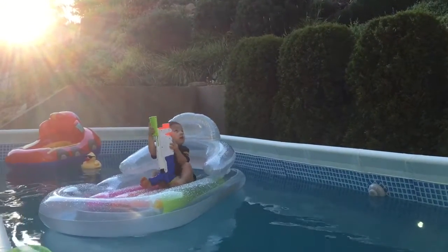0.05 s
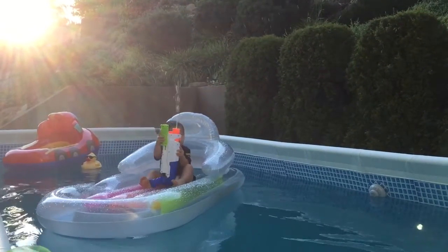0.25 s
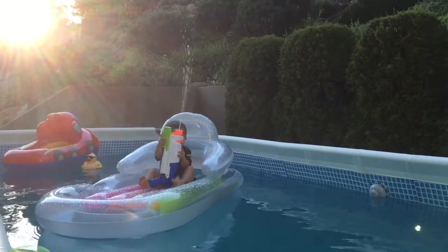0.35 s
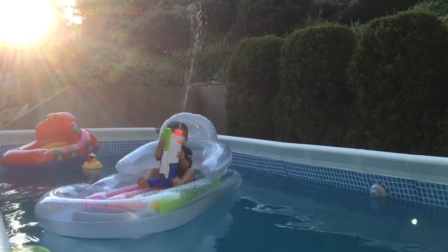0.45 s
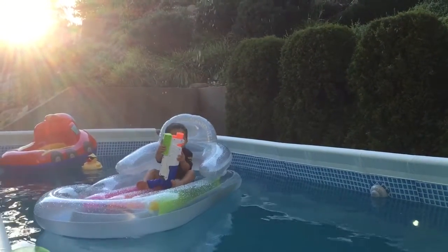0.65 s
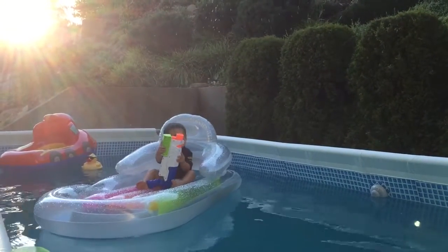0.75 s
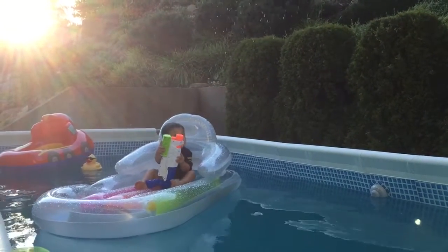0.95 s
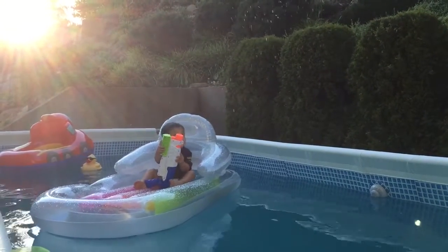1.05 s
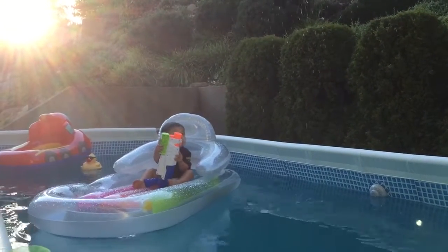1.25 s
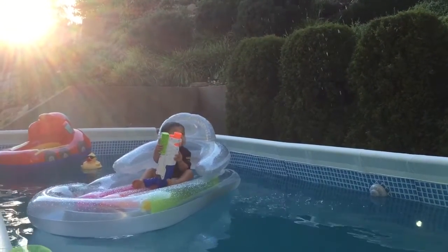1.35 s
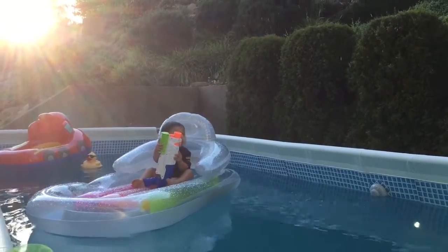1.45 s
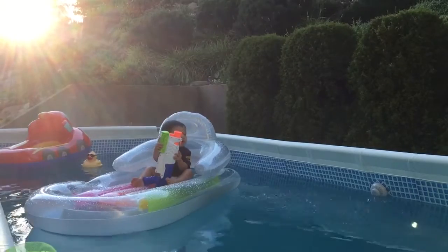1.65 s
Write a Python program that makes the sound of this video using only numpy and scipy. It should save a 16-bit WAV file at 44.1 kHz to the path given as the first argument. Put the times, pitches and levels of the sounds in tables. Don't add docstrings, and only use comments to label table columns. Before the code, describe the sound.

Short sputtering squirt from a plastic water gun, then near silence over faint pump hum and far traffic, then a dull splash on inflated vinyl and small drips in the pool, heard outdoors from a few metres.

```python
import sys
import numpy as np
from scipy import signal
from scipy.fft import rfft, irfft
from scipy.io import wavfile
from scipy.ndimage import uniform_filter1d

SR = 44100
rng = np.random.default_rng(int(sys.argv[2]) if len(sys.argv) > 2 else 0)


def magnitude_from_level(level_db):
    exponent = np.asarray(level_db, float) / 20
    return 10 ** exponent


def wav_record(signal):
    frames = np.transpose(np.atleast_2d(signal))
    bounded = np.clip(frames, -1, 1)
    quanta = np.round(bounded * 32767).astype(np.int16)
    wavfile.write(sys.argv[1], SR, quanta)


N = 74970
T = np.arange(N) / SR

# f/Hz, density/dB
GARDEN_SPECTRUM = [(18, -89), (30, -23), (55, -0.5), (151, -2.5), (201, -9), (314, -7.5), (441, -21),
                   (476, -17), (15300, -44)]
# f/Hz, width/Hz, level/dB
PUMP_HUM = [
    (146, 16, -64.5),
    (104.4, 56, -66),
    (304.2, 11.4, -74.5),
]
# t/s, level/dB, f/Hz, length/s
GURGLES = [(.172, -59.5, 1770, 0.015), (.265, -50.5, 1295, 0.0072), (.292, -52, 1500, 0.011),
           (.271, -54, 1970, 0.013), (.28, -63, 803, 0.02), (.55, -62.5, 751, 0.038),
           (.612, -58, 950, 0.035), (.62, -50.5, 261.7, 0.03), (.668, -47.5, 310, 0.021),
           (.668, -58.5, 1500, 0.045), (.135, -56, 253.6, 0.023)]
# t/s, level/dB, hold/s, bubble f/Hz, barrel level/dB
AIR_POCKETS = [(0.2034, -42.5, 0.00061, 10400, -24), (0.211, -63, .001, 12300, -24),
               (0.2214, -39.5, 0.0047, 1902, -8.5), (0.226, -42, 0.0059, 2950, -8),
               (0.291, -43, 0.0036, 5880, -25), (0.297, -44.5, 0.0069, 4000, -4),
               (0.3213, -41, 0.0053, 5560, -27), (0.333, -45.5, 0.0037, 5930, -18),
               (.338, -42.5, 0.0061, 2294, -22), (0.3515, -40, 0.0073, 2170, -4.5),
               (.353, -43.5, 0.0064, 6840, -25), (0.3682, -40, .002, 13500, -12),
               (.369, -45.5, .008, 6680, -26), (.38, -45.5, 0.0045, 2780, -21),
               (0.396, -47, 0.0093, 4030, -26), (0.43, -41, 0.00066, 13200, -14),
               (.44, -44, 0.00039, 10000, -14), (0.4442, -39, .0004, 13000, -12),
               (0.449, -42, 0.00051, 12500, -10), (0.455, -50.5, 0.0066, 4460, -33),
               (.472, -42, .0005, 13000, -14), (0.518, -43, 0.0011, 13000, -16),
               (0.5282, -35, 0.0067, 1923, -5), (.537, -44.5, 0.0054, 4425, -16),
               (0.556, -40, .002, 13000, -17), (0.562, -46.5, 0.0056, 3120, -16),
               (0.573, -44, .002, 14000, -15), (0.5778, -31.5, 0.0067, 3110, 1.5),
               (0.587, -38, 0.0044, 6200, -2), (.603, -46, 0.012, 1950, -17),
               (0.627, -32, .0009, 14200, -21), (0.633, -42.5, .003, 6070, -12),
               (.654, -44.5, 0.0045, 3650, -29), (0.6568, -35.5, 0.0047, 13900, -8),
               (0.6607, -36, 0.0075, 2494, -3.5), (0.666, -41, 0.0059, 3470, -5),
               (0.694, -57.5, .008, 3490, -14)]
BARREL_MODES = [0, 3, -4, -5]
# t/s, level/dB, treble tilt/dB
MAIN_STROKE = [
    (.2, -53.5, 11),
    (.219, -53, 5),
    (.235, -53.5, 0.5),
    (0.286, -50.5, -14),
    (0.289, -45.5, 9),
    (.37, -46, 5),
    (.43, -50.5, 12.5),
    (.52, -53, 3.5),
    (0.527, -45.5, -1),
]
# t/s, level/dB, treble tilt/dB
SPUTTER = [
    (.54, -40, -0.5),
    (.575, -45.5, 4),
    (.595, -47, 15),
    (0.598, -51, -22),
    (.6255, -55, -22),
    (0.63, -44.5, 7),
    (0.678, -47, 2),
    (.7, -53.5, -3),
    (.75, -72, -3),
]
# f/Hz, density/dB
JET_SPECTRUM = [(410, -45), (750, -15), (1150, -23), (1700, -9), (2300, -5), (6120, -7.5), (11000, -8.5),
                (15300, -6)]
# t/s, plink level/dB, f/Hz, tick level/dB
POOL_DROPS = [(1.393, -66, 9600, -50), (1.419, -76, 7950, -58), (1.434, -71, 8600, -60),
              (1.461, -68, 9050, -58), (1.479, -64, 7500, -54), (1.483, -61, 14000, -54),
              (1.4895, -52, 5660, -51.5), (1.4972, -55.5, 4380, -67), (1.506, -57.5, 3000, -64),
              (1.512, -60.5, 2980, -70), (1.519, -62, 8900, -52), (1.525, -63, 8000, -56),
              (1.5305, -72, 7900, -62), (1.528, -64, 5900, -61), (1.545, -58, 5600, -60),
              (1.5665, -56, 4340, -62), (1.572, -70, 13000, -61), (1.606, -54, 5240, -56),
              (1.6199, -46.5, 3160, -49.5), (1.633, -47.5, 1700, -51), (1.638, -81, 11000, -53),
              (1.656, -60, 1700, -70), (1.66, -66, 8700, -60), (1.6642, -44, 2593, -52),
              (1.681, -60, 9000, -66), (1.686, -52.5, 3240, -47.5), (1.694, -62, 13000, -56),
              (1.696, -59, 1750, -70), (1.643, -60, 3300, -78), (.959, -68, 3700, -77)]
# f/Hz, level/dB, t60/s
RAFT_MODES = [
    (96.4, -31, 0.11),
    (340, -54, 0.13),
    (569, -46, 0.055),
    (1500, -58, 0.059),
    (2000, -50, 0.026),
    (3000, -48, 0.013),
]
# f/Hz, density/dB
FOAM_SPECTRUM = [(88, -19), (150, -5), (1210, -18), (1300, -15.5), (2030, -14), (2670, -19.5), (9000, -47),
                 (11700, -54), (19800, -120)]
# t/s, level/dB, f/Hz, length/s
SQUEAKS = [
    (1.425, -67.5, 6440, 0.055),
    (1.43, -70, 5200, 0.03),
]


def unit(x):
    return x / np.sqrt(np.mean(x ** 2))


def band(x, hz, width_hz):
    return signal.lfilter(*signal.iirpeak(min(hz, 16000), hz / width_hz, fs=SR), x)


def colour(x, spectrum):
    hz, db = np.array(spectrum).T
    grid_hz = np.linspace(1, SR / 2, 4097)
    log_gain = np.interp(np.log(grid_hz), np.log(hz), db) * np.log(10) / 20
    cepstrum = irfft(log_gain)
    cepstrum[1:4096] *= 2
    cepstrum[4097:] = 0
    impulse = irfft(np.exp(rfft(cepstrum)))
    return unit(signal.fftconvolve(x, impulse)[:len(x)])


def walk(rate_hz):
    k = int(SR / rate_hz)
    steps = np.repeat(rng.standard_normal(N // k + 1), k)
    return unit(uniform_filter1d(uniform_filter1d(steps, k), k)[:N])


def gritty(db, size=N):
    sizes = magnitude_from_level(db * np.minimum(rng.exponential(size=size), 4))
    return unit(rng.standard_normal(size) * sizes)


def fade(t, t60):
    return (t >= 0) * magnitude_from_level(-60 * np.maximum(t, 0) / t60)


def add(out, s, x):
    i = int(s * SR)
    out[i:i + len(x)] += x[:N - i]


def garden():
    patches = 0
    for hz in 40 * 2 ** np.arange(0, 6, 1 / 3):
        patches = patches + magnitude_from_level(2.5 * walk(14)) * band(rng.standard_normal(N), hz, hz / 5)
    highpass = signal.butter(2, 2300, "high", fs=SR, output="sos")
    leaves = signal.sosfilt(highpass, rng.standard_normal(N))
    air = colour(patches + leaves, GARDEN_SPECTRUM) * magnitude_from_level(-57 + walk(5.45))
    hum = 0
    for hz, width_hz, db in PUMP_HUM:
        tone = band(band(rng.standard_normal(N), hz, width_hz), hz, width_hz)
        hum = hum + magnitude_from_level(db + 0.5 * walk(9.2)) * unit(tone)
    return air + hum


def warbles(notes):
    rise, waver, wobble_db = 0.037, 0.0114, 3.5
    out = 0
    for s, db, hz, length in notes:
        u = (T - s) / length
        pitch = hz * (1 + rise * np.clip(u, -1, 1) * (hz < 3000) + waver * walk(200))
        level = magnitude_from_level(db + wobble_db * min(hz / 1000, 1) * walk(200))
        out = out + level * np.exp(-4 * u ** 2) * np.sin(2 * np.pi * np.cumsum(pitch) / SR)
    return out


def barrel(x):
    pipe_hz, width_hz = 3120, 150
    modes = 0
    for k, db in enumerate(BARREL_MODES, 1):
        modes = modes + magnitude_from_level(db) * band(x, pipe_hz * k, width_hz * k)
    return unit(modes)


def bubble_note(hz, t):
    q, steady, sag, sag_s, big_below_hz = 25, 1.4, .7, .0035, 2750
    a, b = rng.standard_normal((2, len(t)))
    shake = signal.lfilter(*signal.butter(1, hz / q / 2, fs=SR), a + 1j * b)
    shake = shake + steady * np.std(shake)
    pitch = hz * (1 + sag * (hz < big_below_hz) * np.exp(-t / sag_s))
    return unit((shake * np.exp(2j * np.pi * np.cumsum(pitch) / SR)).real)


def spits():
    bubble_db, click_db, click_t60_s = -1.5, 7, .006
    out, t = np.zeros(N), T[:4000]
    for s, db, hold, hz, ring_db in AIR_POCKETS:
        tiny = hz > 9000
        onset_s = .003 if s > .655 else .0003
        t60 = (.003 if tiny else .014) + 4.9 * hold
        env = np.minimum(t / onset_s, 1) * fade(np.maximum(t - hold, 0), t60)
        rasp = gritty(1.5, size=4000)
        drive = rasp * (1 + magnitude_from_level(click_db) * fade(t, click_t60_s))
        if tiny:
            drive = unit(np.diff(drive, n=3, prepend=[0, 0, 0]))
        pocket = colour(drive, JET_SPECTRUM) + magnitude_from_level(bubble_db) * bubble_note(hz, t)
        pocket = pocket + magnitude_from_level(ring_db) * barrel(drive)
        add(out, s, magnitude_from_level(db) * env * unit(pocket))
    return out


def fizz(lo_hz, hi_hz):
    per_s, cycles, bands = 800, 25, 14
    out = 0
    for hz in np.geomspace(lo_hz, hi_hz, num=bands):
        hits = rng.random(N) < per_s / bands / SR
        kicks = hits * magnitude_from_level(3.0 * np.minimum(rng.exponential(size=N), 3))
        out = out + unit(band(kicks, hz, hz / cycles)) / np.sqrt(hz)
    return unit(out)


def jet():
    valve_opens_s, fizz_db, barrel_db, flicker_db = .2036, -5, -15.5, 1.2
    s, db, tilt_db = np.vstack([MAIN_STROKE, SPUTTER]).T
    hiss = unit(colour(gritty(2.7), JET_SPECTRUM) + magnitude_from_level(fizz_db) * fizz(1898, 7370))
    hiss = unit(hiss + magnitude_from_level(barrel_db) * barrel(hiss))
    low = signal.sosfiltfilt(signal.butter(4, 6000, fs=SR, output="sos"), hiss)
    high = hiss - low
    tilt = np.interp(T, s, tilt_db)
    low = low * magnitude_from_level(flicker_db * walk(60.2) - tilt / 2)
    high = high * magnitude_from_level(flicker_db * walk(89.9) + tilt / 2)
    level = np.interp(T, s, db, left=-120, right=-120)
    return (low + high) * (T > valve_opens_s) * magnitude_from_level(level + flicker_db * walk(152.4))


def drops():
    cycles, attack_cycles, dip = 46, 5, .06
    out, t = np.zeros(N), T[:3000]
    for s, db, hz, tick_db in POOL_DROPS:
        a, b = rng.standard_normal((2, 3000))
        settling = dip * 3 / hz * np.exp(-t * hz / 3)
        tone = np.sin(2 * np.pi * hz * (t - settling))
        tone = tone * fade(t - attack_cycles / hz / 2, cycles / hz) * np.minimum(t * hz / attack_cycles, 1)
        ring = magnitude_from_level(-9) * unit(band(a, hz, hz / 30)) * fade(t, .06) * np.minimum(t / 0.0023, 1)
        tick = unit(signal.lfilter(*signal.butter(2, 5000, "high", fs=SR), b)) * fade(t, .008)
        smack = magnitude_from_level(1) * a * fade(t, .002)
        add(out, s, magnitude_from_level(db) * (2 * tone + ring) + magnitude_from_level(tick_db) * (tick + smack))
    return out


def mist():
    swell = np.exp(-((T - 1.32) / 0.054) ** 2)
    return magnitude_from_level(-79.5 + 3.7 * walk(100)) * unit(band(gritty(2.4), 13300, 4000)) * swell


def raft(thump_s):
    t = T - thump_s
    push = np.zeros(N)
    add(push, thump_s, gritty(3.2, size=600) * fade(T[:600], 0.016) / 6)
    modes = 0
    for hz, db, t60 in RAFT_MODES[1:]:
        pole = np.exp(2j * np.pi * hz / SR - np.log(1000) / (t60 * SR))
        modes = modes + magnitude_from_level(db) * signal.lfilter([1], [1, -pole], push).imag
    hz, db, t60 = RAFT_MODES[0]
    late = t - 0.0121
    boom = magnitude_from_level(db) * np.sin(2 * np.pi * hz * late) * fade(late, t60) * np.clip(late / 0.0078, 0, 1)
    crack = magnitude_from_level(-56) * gritty(1.7) * fade(t, 0.023)
    return crack + modes + boom


def splash(thump_s):
    splash_db, splash_t60_s, slap_db, slap_t60_s, fizz_db = -46, 0.42, 0, .06, -9
    t = T - thump_s
    foam = colour(gritty(2.85), FOAM_SPECTRUM) + magnitude_from_level(fizz_db) * fizz(690, 3700)
    decay = fade(t, splash_t60_s) + magnitude_from_level(slap_db) * fade(t, slap_t60_s)
    foam = foam * magnitude_from_level(splash_db + 2 * walk(200)) * np.clip(t / 0.0055, 0, 1) * decay
    spray = magnitude_from_level(-72.5 + 3.0 * walk(119.8)) * unit(band(gritty(3.4), 9300, 14000)) * (t > 0)
    return foam + spray


def echo(near):
    t = T[:12000]
    tail = signal.lfilter(*signal.butter(1, 6000, fs=SR), rng.standard_normal(12000))
    tail = tail * fade(t - .006, 0.068)
    return magnitude_from_level(-21) * signal.fftconvolve(near, tail / np.sqrt(np.sum(tail ** 2)))[:N]


def scene():
    thump_s = 1.3745
    gun = warbles(GURGLES) + spits() + jet()
    landing = drops() + raft(thump_s) + splash(thump_s) + warbles(SQUEAKS)
    near = gun + landing
    return (garden() + near + mist() + echo(near))[None]


def top_cut(x):
    return signal.sosfilt(signal.butter(12, 16460, fs=SR, output="sos"), x)


def record(dry):
    mix = dry - 0.5 * band(dry, 10540, 280)
    mix = signal.sosfilt(signal.ellip(12, .3, 50, 15250, fs=SR, output="sos"), mix)
    return top_cut(mix)


dry = scene()
out = record(dry)
wav_record(out)
```